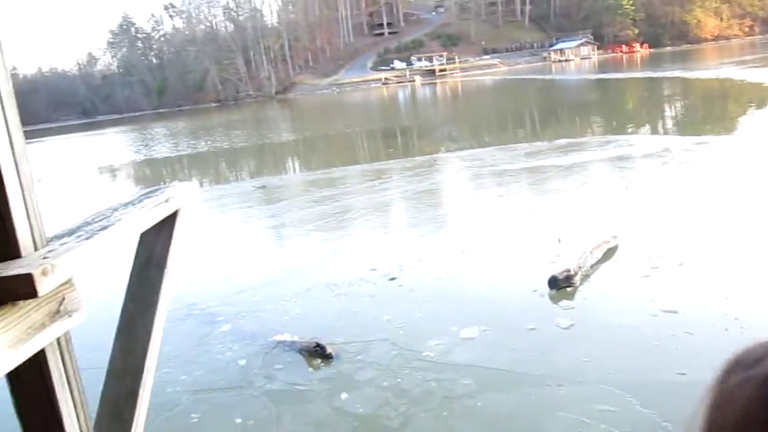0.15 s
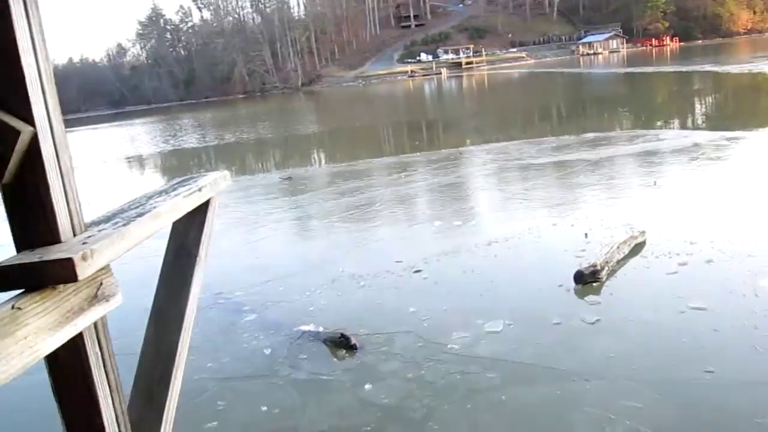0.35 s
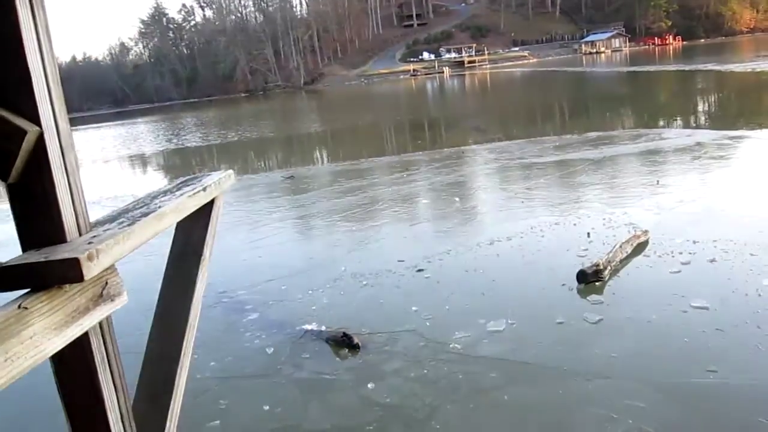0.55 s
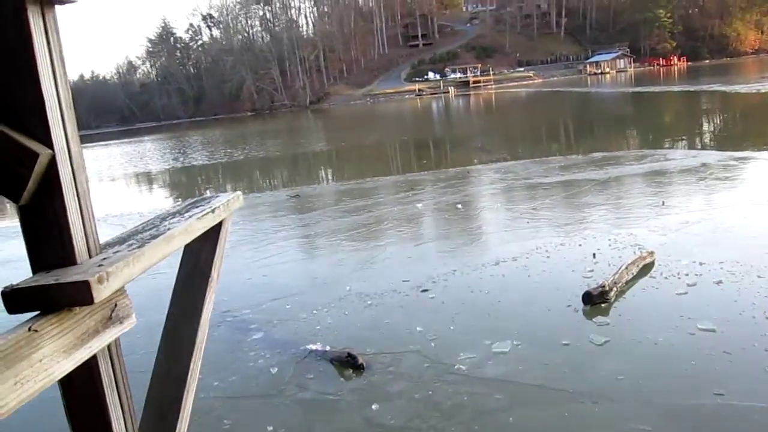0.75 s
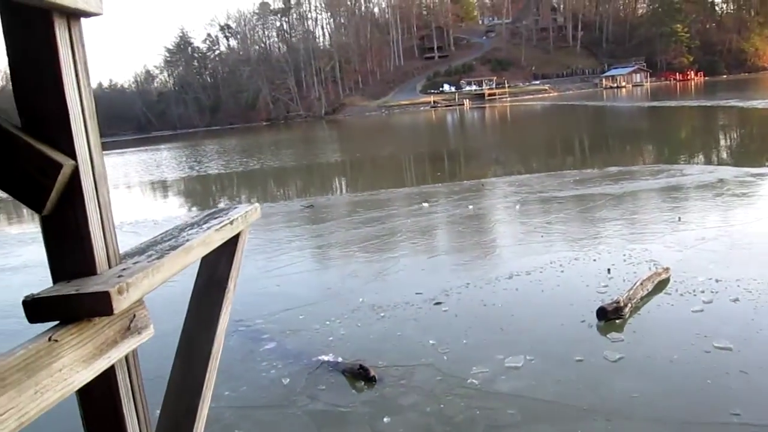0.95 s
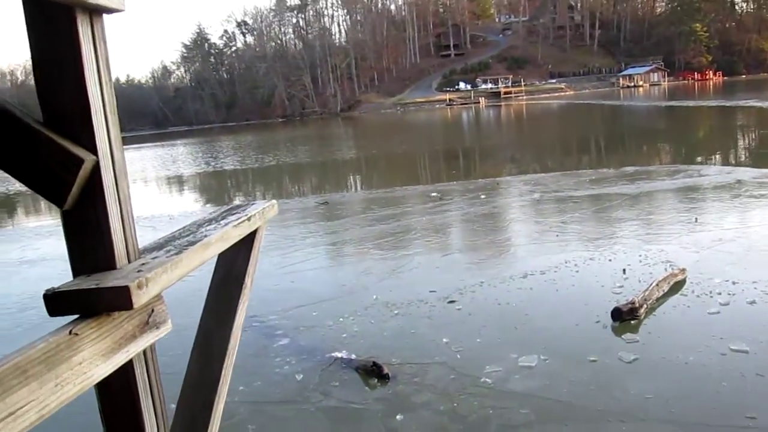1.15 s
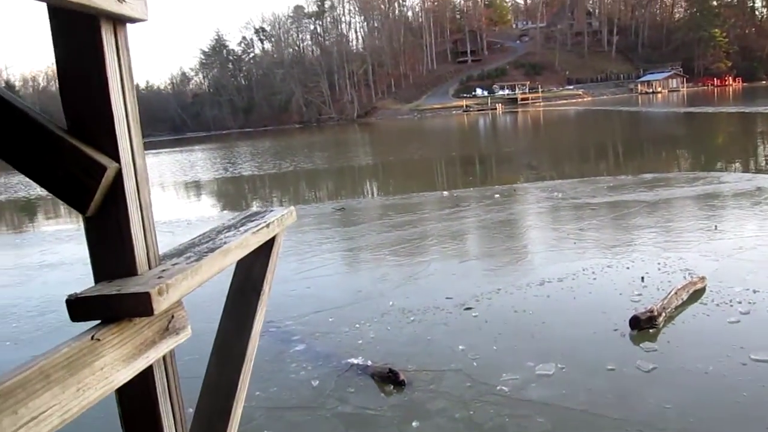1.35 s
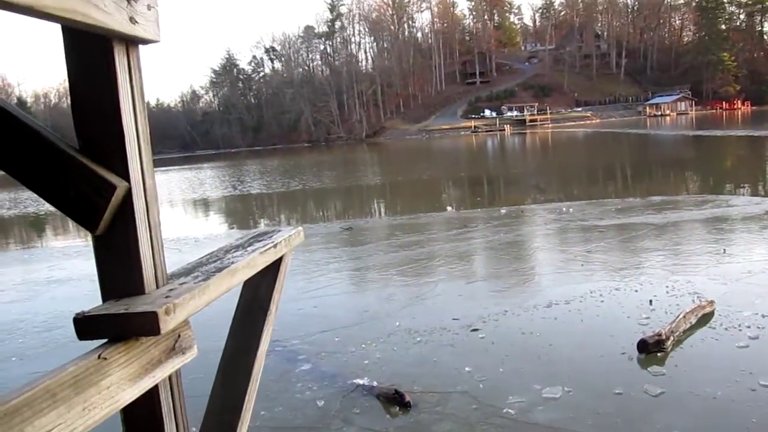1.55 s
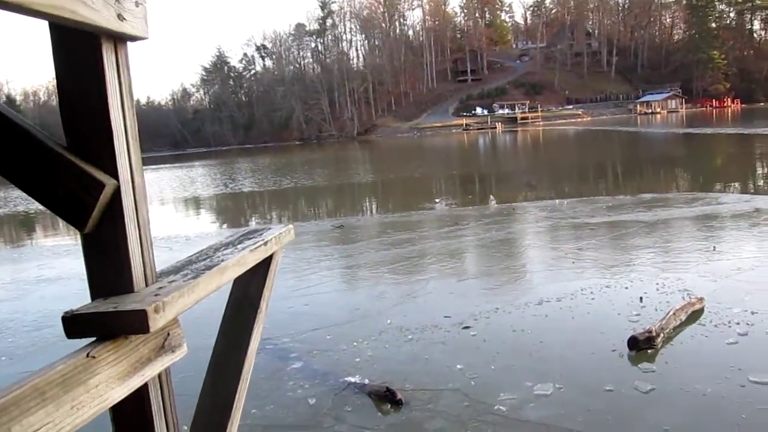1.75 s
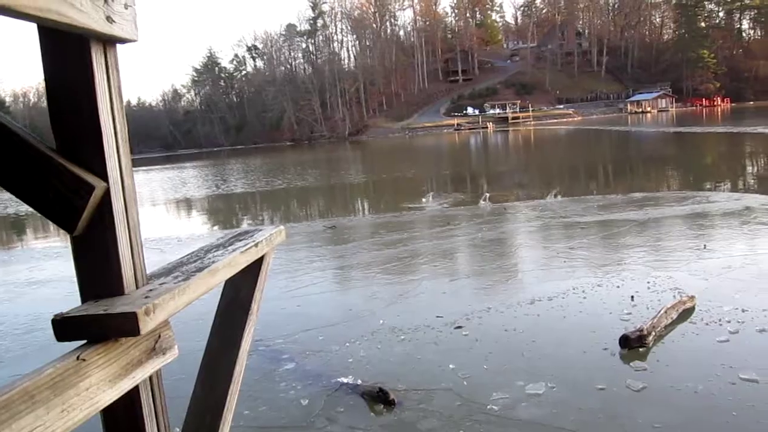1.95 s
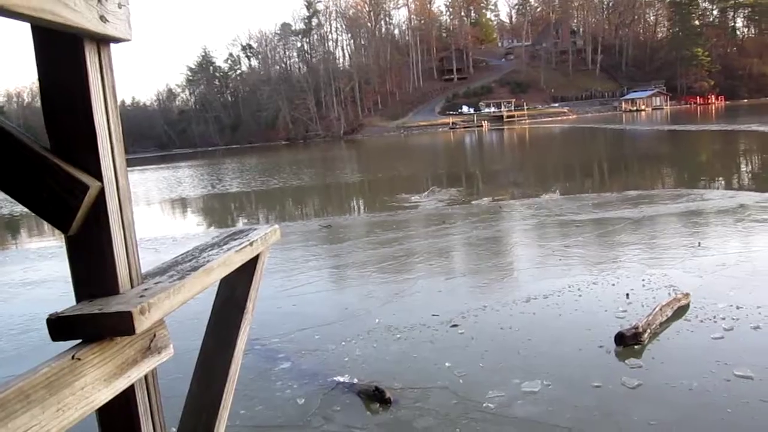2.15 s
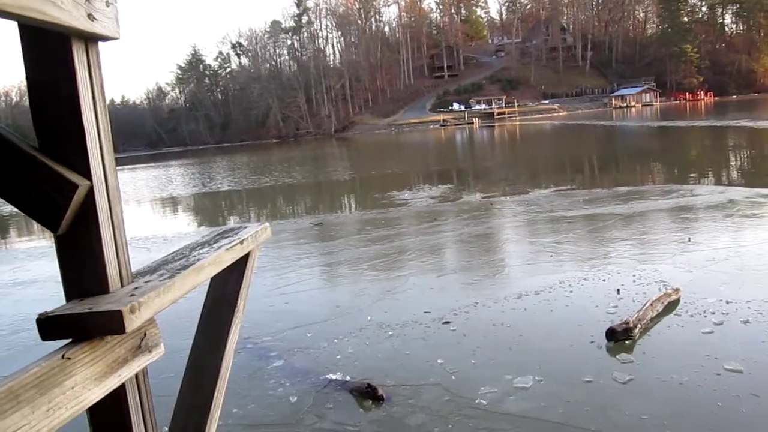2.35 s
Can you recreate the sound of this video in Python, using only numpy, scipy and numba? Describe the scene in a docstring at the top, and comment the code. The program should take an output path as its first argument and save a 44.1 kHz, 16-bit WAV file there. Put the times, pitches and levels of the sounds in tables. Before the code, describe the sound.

Ice cracks sharply onto a frozen lake, then pieces skip off with ringing clicks.

```python
"""Over light wind and open-air hiss, a dull thump sounds close by. A thrown piece of ice then smashes on
a thin frozen lake: each impact is a short click, led by the ring of the sheet, which carries sound faster
than the air. Shards skip and skitter away, tinkling at their natural frequencies, while more thumps and a
rustle sound nearby. The ring rises in pitch as the shards reach thinner ice. The last clicks fade among
hollow knocks from thick ice, faint far whistles and two more thumps."""
import sys
import numpy as np
from scipy import signal
from scipy.fft import rfft, irfft
from scipy.io import wavfile
from scipy.ndimage import uniform_filter1d
from numba import njit

SR = 44100
rng = np.random.default_rng(int(sys.argv[2]) if len(sys.argv) > 2 else 0)


def transcribe(signal):
    """Save signal, clipped to [-1, 1], as a 16-bit WAV file at the path in sys.argv[1]."""
    frames = np.atleast_2d(signal).T
    limited = np.clip(frames, -1, 1)
    pcm = np.round(limited * 32767).astype(np.int16)
    wavfile.write(sys.argv[1], SR, pcm)


N = 105840
T = np.arange(N) / SR

# pitches as the shards slide out to thinner ice: time_s, sheet_hz, skitter_hz
THINNING_ICE = [(.2, 1658, 2500), (.8, 1597, 2660), (.95, 2250, 3220), (1.3, 2040, 3060), (1.5, 2780, 3180),
                (1.75, 2960, 3800), (2.4, 2850, 4070)]
# modes of a larger shard: pitch_hz, level_db, t60_s
SHARD_MODES = [(6300, -8, 0.0067), (6403, -0.5, 0.041), (5400, -9, 0.026)]
# modes of small chips: pitch_hz, level_db, t60_s
CHIP_MODES = [(8760, 0, .016), (9150, -5, .012), (12100, -13, .012)]
TINKLE_START_S, TINKLE_END_S, CHIP_STEP_DB = .3, 1.05, -8  # the chips tinkle most in this span
SHEET_WIDTH = .27  # all widths are bandwidth over centre frequency


def undb(db):
    """Decibels to amplitude ratio."""
    return 10 ** (np.asarray(db) / 20)


def unit(x):
    """Normalise to rms 1."""
    return x / np.sqrt(np.mean(x ** 2))


def at_peak(x, db):
    """Normalise to a peak level."""
    return x * undb(db) / np.abs(x).max()


def fade(t, t60):
    """Exponential damping: 60 dB in t60 seconds."""
    return np.exp(-np.log(1000) * t / max(t60, 1e-3))


def add(out, x, start_s):
    """Superpose x on out from start_s on."""
    i = max(int(start_s * SR), 0)
    out[i:i + len(x)] += x[:N - i]


def curve(table, column):
    """Linear interpolation of a table column over time."""
    return np.interp(T, np.array(table)[:, 0], np.array(table)[:, column])


@njit
def resonator(x, hz, width):
    """Second-order resonance with a moving centre, gain 1 there."""
    y, band, low = np.empty(len(x)), 0., 0.
    for i in range(len(x)):
        g = np.tan(np.pi * hz[i] / SR)
        v = (band + g * (x[i] - low)) / (1 + g * (g + width))
        band, low, y[i] = 2 * v - band, low + 2 * g * v, width * v
    return y


def bandpass(x, hz, width):
    """Resonance at a steady or moving frequency."""
    return resonator(x, np.full(len(x), 1.) * hz, width)


def ring(x, hz, width):
    """Two resonances in cascade give a band with steeper skirts."""
    return bandpass(bandpass(x, hz, width), hz, 2 * width)


def modes(x, table):
    """Modal response: the longer a mode rings, the narrower its band."""
    return sum(undb(db) * np.sqrt(t60 * hz) * bandpass(x, hz, np.log(1000) / np.pi / t60 / hz)
               for hz, db, t60 in table) / 4


def edge(x):
    """Brief contacts are rich in treble: the band from 6.6 to 10.8 kHz."""
    highpass = signal.butter(3, 6600, "high", fs=SR, output="sos")
    lowpass = signal.butter(2, 10800, fs=SR, output="sos")
    return signal.sosfilt(np.vstack([highpass, lowpass]), x)


def air(level_db=-51.5, gust_db=2.8, gust_top_hz=199):
    """Amplitude modulation: wind gusts vary the bass of a steady hiss."""
    # spectrum of the open air: frequency_hz, density_db
    spectrum = [(15, -32), (25, 3), (187, -2.5), (553, -7), (1010, -2.5), (1780, -7), (2090, -7),
                (6040, -20.5), (7300, -15), (13600, -26), (16500, -23)]
    band_hz, density_db = np.array(spectrum).T
    hz = np.maximum(np.arange(N // 2 + 1) * SR / N, 1)
    hiss = rfft(rng.standard_normal(N)) * undb(np.interp(np.log(hz), np.log(band_hz), density_db))
    bass_share = 1 / (1 + (hz / gust_top_hz) ** 2)
    window = SR // 40
    gust = unit(uniform_filter1d(uniform_filter1d(rng.standard_normal(N), window), window))
    bass = irfft(hiss * bass_share, N) * undb(gust_db * gust)
    return undb(level_db) * unit(bass + irfft(hiss * (1 - bass_share), N))


def thumps(rise_s=.0047):
    """Free vibration of low damped modes, as of planks or a camera body being bumped."""
    # nearby bumps: start_s, level_db, pitch_hz
    bumps = [(0., -25.5, 102), (0.224, -47, 70), (0.607, -41.5, 111), (0.667, -37, 168.7),
             (0.754, -41, 344.4), (2.22, -38.5, 94.2), (2.248, -38.5, 100.5)]
    # modes of the bumped body: pitch_ratio, level_db, t60_s
    body_modes = [(1, -4, 0.16), (1.9, -12.5, 0.28), (3.4, -10, 0.056), (2.6, -14.5, 0.21)]
    out, t = np.zeros(N), T[:16384]
    for start_s, db, hz in bumps:
        body = sum(undb(mode_db) * fade(t, t60) * np.cos(2 * np.pi * ratio * hz * t)
                   for ratio, mode_db, t60 in body_modes)
        add(out, undb(db) * np.minimum(t / rise_s, 1) * body, start_s)
    return out


def knocks(rise_s=.0012, sheet_lead_s=.002022, snap_db=15, ringing_s=.025):
    """Impact excitation: a snap and a crunch ring the ice; the wave in the sheet outruns that in air."""
    # impacts on the ice, levels as peaks: time_s, click_db, click_hz, sheet_db, shard_db, treble_db, t60_s
    impacts = [(0.1336, -30, 7000, -62, -70, -52, 0.004), (0.1927, -42, 3260, -52, -64, -44, 0.0071),
               (0.2065, -9, 5070, -17.5, -30, -6, 0.019), (0.208, -18.5, 5400, -34, -29, -37, 0.062),
               (0.2191, -6.5, 4100, -21.5, -22, -29, 0.0044), (0.2263, -10.5, 3130, -15.5, -47, -6, 0.0081),
               (0.2274, -5.5, 2530, -13.5, -20, -36, 0.007), (0.234, -14, 2320, -36, -46, -17, 0.0038),
               (0.2576, -26, 2390, -35, -48, -33, 0.016), (0.3407, -19, 3850, -17.5, -33, -24.5, 0.01),
               (0.3458, -45, 3680.0, -23, -59, -36, 0.0098), (0.3682, -22, 2280, -27.0, -50.0, -23, 0.01),
               (0.3751, -22, 3640, -27.5, -53, -20.5, 0.0051), (0.3766, -20, 3900, -32, -52.0, -38, 0.032),
               (0.3879, -40, 3600, -22, -49, -27, 0.0078), (0.3893, -42, 3800, -41, -51, -27, 0.014),
               (0.411, -34, 2390, -31, -37, -45, 0.0073), (0.4338, -45, 3880.0, -34, -61, -46, 0.009),
               (0.4467, -24, 4000, -30, -30.5, -51, 0.0082), (0.45, -27.5, 4000, -23, -46, -29.5, 0.011),
               (0.4629, -33, 3340, -23, -49, -28, 0.0044), (0.496, -26, 5300, -33, -54, -33, 0.0073),
               (0.51, -41, 2520.0, -38, -39, -37, 0.012), (0.5265, -26, 2380, -24.5, -35.5, -49, 0.019),
               (0.552, -37, 2660, -31, -44, -37.5, 0.017), (0.5653, -22.5, 3030, -28.5, -42, -28, 0.012),
               (0.61, -25, 3300, -35, -57, -31, 0.017), (0.6236, -22, 3700, -30.5, -57.0, -52, 0.0058),
               (0.6673, -49, 4500, -28.5, -55, -36, 0.012), (0.6804, -19.5, 3450, -29, -35, -22, 0.019),
               (0.685, -19.5, 3320, -31.5, -55, -52, 0.0062), (0.7181, -23, 4730, -32, -49, -19, 0.013),
               (0.7477, -23.5, 2650, -47, -51, -30, 0.0094), (0.7786, -24, 3300, -25, -39, -33, 0.014),
               (0.7861, -23.5, 3280, -25, -37, -39, 0.012), (0.816, -31, 4400, -25, -57.0, -38, 0.023),
               (0.8349, -18.5, 3100, -23.5, -25, -43, 0.021), (0.9028, -24, 2650, -25.5, -38, -54, 0.01),
               (0.9263, -7, 5150, -12.5, -19, -34, 0.0032), (0.9269, -21, 5100, -42, -18, -45, 0.02),
               (0.951, -43, 6000, -37, -26.5, -51, 0.011), (0.96, -29, 3970, -30, -27, -50, 0.017),
               (0.9734, -39, 2410.0, -29, -30, -39, 0.013), (0.995, -33, 3950, -42, -33.5, -32, 0.012),
               (1.0105, -49, 9000, -42, -55, -36, 0.011), (1.0445, -32.5, 5570, -53, -57, -45, 0.015),
               (1.063, -28, 2780, -38.5, -48, -36, 0.022), (1.0993, -23.5, 2860, -30, -39, -15.0, 0.0078),
               (1.109, -30, 4240, -27.5, -33, -51, 0.016), (1.115, -20, 2560, -30, -58, -53, 0.0093),
               (1.1217, -42, 3870, -26, -56, -29, 0.0098), (1.1305, -34, 2850, -30, -36, -45, 0.014),
               (1.166, -38, 3100, -26, -34.5, -51, 0.036), (1.1706, -24.5, 3520, -31, -57, -56, 0.014),
               (1.1755, -25, 2400, -43, -57, -51, 0.0052), (1.201, -32, 2670.0, -32, -59.0, -57, 0.014),
               (1.2104, -29, 2740, -28, -61, -55, 0.015), (1.2345, -21.5, 3410, -27, -61, -40, 0.051),
               (1.236, -29, 3370, -32, -62, -62, 0.077), (1.2572, -49, 3270.0, -48, -64, -34, 0.0093),
               (1.2734, -23.5, 3070, -24, -39, -47, 0.025), (1.288, -34, 2700, -47, -61, -40, 0.012),
               (1.313, -29, 3240, -31, -60, -47, 0.031), (1.3286, -31.5, 3370, -41, -41, -55, 0.012),
               (1.3332, -24.5, 3900, -28, -59, -44, 0.029), (1.4107, -22, 3420, -38, -46, -52, 0.06),
               (1.4161, -14.5, 3940, -31, -43, -41, 0.015), (1.4474, -35, 2800, -23, -58, -37.0, 0.017),
               (1.4812, -35, 2740, -48, -50, -52, 0.014), (1.487, -28, 3550, -48, -51, -42, 0.0061),
               (1.5008, -48, 2940, -44, -40, -26.5, 0.0093), (1.5202, -24, 3050, -32, -54, -56, 0.025),
               (1.5337, -24.5, 4140, -29.5, -59, -29.5, 0.022), (1.5638, -25.5, 3380, -40, -61, -49, 0.016),
               (1.57, -27.5, 3330, -43, -60, -49, 0.026), (1.6136, -33, 3200, -37, -66, -37, 0.011),
               (1.646, -25.5, 4000, -32, -62.0, -37, 0.036), (1.6592, -27, 3840, -34.5, -66, -42, 0.011),
               (1.742, -32.5, 4480.0, -61, -54, -28, 0.015), (1.758, -26.5, 4300, -65, -39, -61, 0.041),
               (1.799, -36, 8150, -62, -57, -31.5, 0.012), (1.821, -32, 4730, -38, -62.0, -46.0, 0.013),
               (1.849, -32, 4270, -46, -66, -55, 0.018), (2.125, -35, 4200, -40.5, -67.0, -41, 0.021),
               (2.16, -35.5, 4400, -51, -52, -41, 0.014), (2.255, -34.5, 2740, -40, -71, -53, 0.017),
               (2.2923, -37, 7650, -41, -64.0, -47, 0.012)]
    out, t = np.zeros(N), T[:3072]
    sheet_hz = curve(THINNING_ICE, column=1)
    snap = undb(snap_db) * (np.arange(len(t)) == int(rise_s * SR))  # first contact
    crunches = np.sign(rng.standard_normal((len(impacts), len(t))))
    chip_sizes = 1 + .02 * rng.standard_normal(len(impacts))  # each knock rings a different chip

    def swell(attack_s, t60):
        """Quadratic rise, then exponential decay."""
        return np.minimum(t / attack_s, 1) ** 2 * fade(np.maximum(t - attack_s, 0), t60)

    for impact, crunch, size in zip(impacts, crunches, chip_sizes):
        time_s, click_db, click_hz, sheet_db, shard_db, treble_db, t60 = impact
        burst = crunch * swell(rise_s, t60) + crunch[0] * snap
        rattle = crunch * swell(rise_s, t60=.045) + snap
        click_width = .38 * min(ringing_s / t60, 1)  # longer knocks have a clearer pitch
        click = at_peak(ring(burst, click_hz, click_width), click_db)
        tick = at_peak(ring(burst * fade(t, t60), hz=3900, width=.9), click_db - 4)
        shard = at_peak(modes(rattle, SHARD_MODES), shard_db)
        treble = at_peak(edge(burst), treble_db)
        chip_modes = [(hz / size, db, decay_s) for hz, db, decay_s in CHIP_MODES]
        chip_db = treble_db + CHIP_STEP_DB * (1 if TINKLE_START_S < time_s < TINKLE_END_S else 2)
        chip = at_peak(modes(rattle, chip_modes), chip_db)
        add(out, click + tick + shard + treble + chip, time_s - rise_s)
        sheet_drive = crunch[::-1] * swell(sheet_lead_s + rise_s, t60)
        sheet = ring(sheet_drive, sheet_hz[int(time_s * SR)], SHEET_WIDTH)
        add(out, at_peak(sheet, sheet_db), time_s - rise_s - sheet_lead_s)
    return out


def sheet_echo(hits, level_db=-10, t60_s=.15, top_hz=5150):
    """Scattering: knocks travel on through the sheet as a short noisy tail."""
    noise = signal.lfilter(*signal.butter(1, top_hz, fs=SR), rng.standard_normal(8192))
    tail = noise * fade(T[:8192], t60_s)
    return undb(level_db) * signal.fftconvolve(hits, tail / np.sqrt(np.sum(tail ** 2)))[:N]


def skitter(clicks_per_s=500, click_t60_s=.004, scatter_db=2.5, slide_db=2):
    """Shot noise and friction: tiny random clicks over a sliding hiss excite sheet, shards and chips."""
    # strength of the sliding, gains on top of the level: time_s, level_db, sheet_db, shard_db, treble_db
    sliding = [(.2, -55.5, 4, -11, -7), (.215, -24.5, -18, -5, -36), (.3, -31, 13, -7.5, -26),
               (.44, -38.5, 6, -3.5, -8), (.6, -44, 5, 2, -18), (.7, -36.5, 10.5, -34, -2.5),
               (.8, -39, 11, -3, -21), (.9, -40, -4, -10, -9), (.94, -41.5, 9, -16, -21),
               (1.0, -40, 6.5, 4, -15), (1.08, -46.5, 6, -2, -12), (1.2, -42, 5, -31, -5),
               (1.35, -43, 6, -15, -1), (1.46, -42, 8, -13, -13), (1.58, -50.5, 9.5, -21, -15),
               (1.7, -50.5, 1, -47, -9), (1.9, -49.5, -5, 3.5, 5), (2.1, -54.5, -2, -21, -1),
               (2.4, -53.5, -25, -22, 1)]
    contacts = rng.random(N) < clicks_per_s / SR
    strengths = undb(scatter_db * np.minimum(rng.exponential(size=N), 3))
    clicks = unit(signal.lfilter([1], [1, -fade(1 / SR, click_t60_s)], contacts * strengths))
    friction = unit((clicks + undb(slide_db)) * rng.standard_normal(N)) * undb(curve(sliding, column=1))
    sheet_drive, shard_drive, treble_drive = (friction * undb(curve(sliding, k)) for k in (2, 3, 4))
    body = 2 * ring(friction, curve(THINNING_ICE, column=2), width=.8)
    scrape = undb(2) * bandpass(friction, hz=850, width=1.)
    sheet = undb(2) * ring(sheet_drive, curve(THINNING_ICE, column=1), SHEET_WIDTH)
    shards = modes(shard_drive, SHARD_MODES)
    chip_gain = np.interp(T, [TINKLE_END_S, TINKLE_END_S + .1], undb([0, CHIP_STEP_DB]))
    chips = modes(treble_drive * chip_gain, CHIP_MODES)
    return body + scrape + sheet + shards + chips + undb(-10.5) * edge(treble_drive)


def hollow_knocks(t60_s=.03):
    """Damped vibration of thick ice in two modes, the second dying twice as fast."""
    # knocks on thick ice: start_s, level_db, pitch_hz, second_hz, second_db
    impacts = [(0.207, -25, 980, 620, -30), (0.2275, -19.5, 1024, 690, -31),
               (1.817, -40.5, 810, 1430, -36.5), (1.914, -50, 1095, 2280, -40.5),
               (2.044, -38, 830, 1100, -37.5), (2.063, -38, 644, 1880, -36)]
    out, t = np.zeros(N), T[:3072]
    decay = fade(t, t60_s)
    for start_s, db, hz, second_hz, second_db in impacts:
        first = undb(db) * decay * np.sin(2 * np.pi * hz * t)
        second = undb(second_db) * decay ** 2 * np.sin(2 * np.pi * second_hz * t)
        add(out, first + second, start_s)
    return out


def rustle(start_s=.655, length_s=.14, level_db=-37.5):
    """Band-limited noise with a quick rise and a linear fall: a low rustle close by."""
    out, progress = np.zeros(N), np.linspace(0, 1, int(length_s * SR))
    noise = unit(bandpass(rng.standard_normal(len(progress)), hz=462, width=2.4))
    envelope = np.minimum(10 * progress, 1) * (1 - progress)
    add(out, undb(level_db) * noise * envelope, start_s)
    return out


def whistles():
    """Linear frequency glides: short pure tones, heard as faint far whistles."""
    # gliding tones: start_s, length_s, from_hz, to_hz, level_db
    glides = [(1.78, .12, 800, 880, -56), (2.065, .08, 650, 680, -57), (2.35, .05, 1010, 1000, -56)]
    out = np.zeros(N)
    for start_s, length_s, from_hz, to_hz, db in glides:
        progress = np.linspace(0, 1, int(length_s * SR))
        phase = 2 * np.pi * np.cumsum(from_hz + (to_hz - from_hz) * progress) / SR
        envelope = np.sqrt(2 * np.sin(np.pi * progress))
        add(out, undb(db) * envelope * np.sin(phase), start_s)
    return out


def scene():
    """Superposition of all sources in one channel."""
    hits = knocks() + hollow_knocks()
    ice = hits + sheet_echo(hits) + skitter()
    return (air() + thumps() + ice + rustle() + whistles())[None]


def record(dry, top_hz=15900):
    """Band limiting: a steep low-pass cuts the highest treble."""
    return signal.sosfilt(signal.ellip(10, .2, 70, top_hz, fs=SR, output="sos"), dry)


dry = scene()
out = record(dry)
transcribe(out)
```